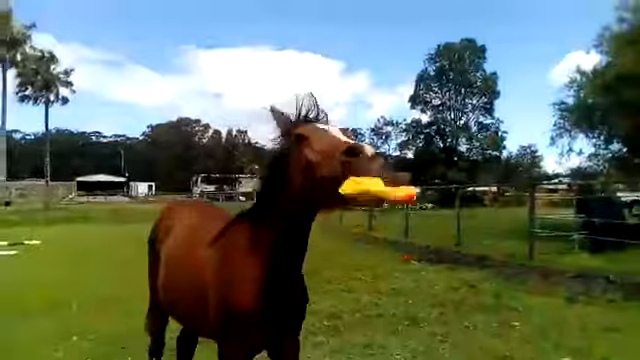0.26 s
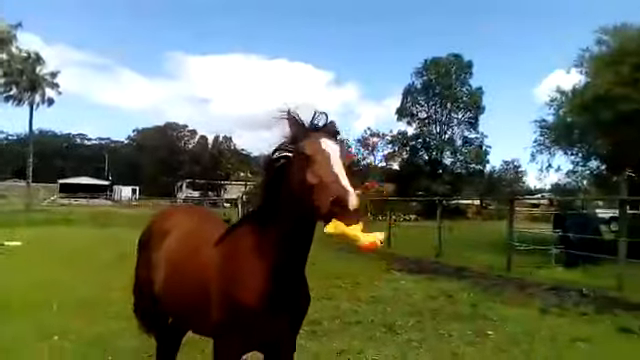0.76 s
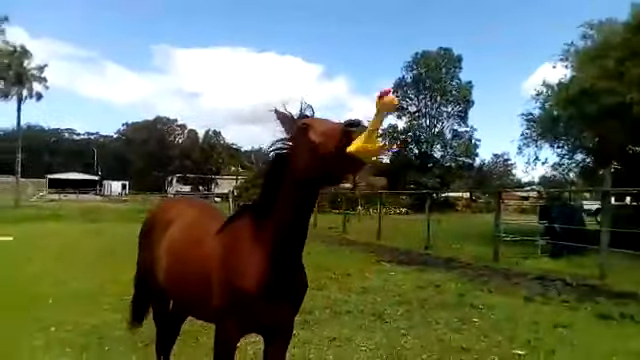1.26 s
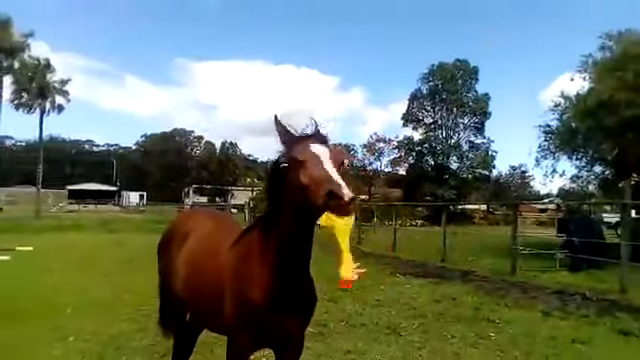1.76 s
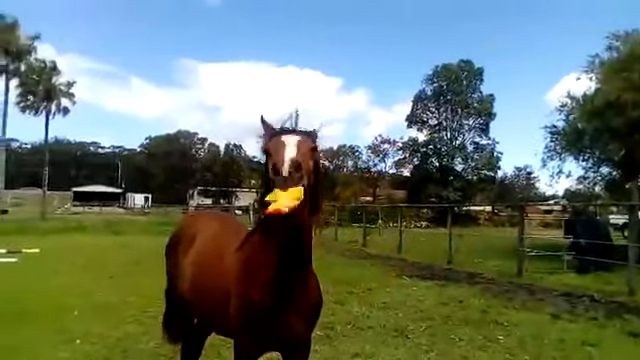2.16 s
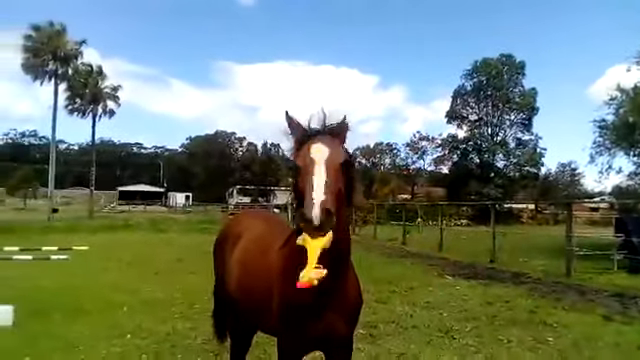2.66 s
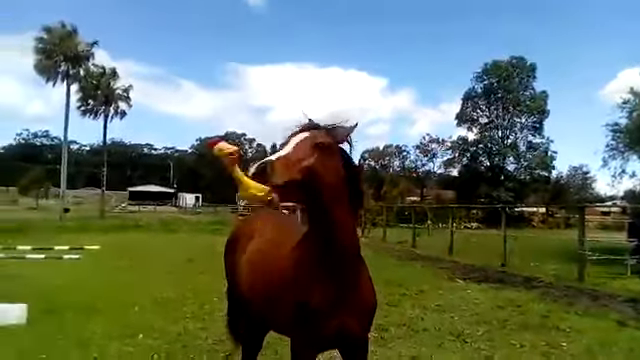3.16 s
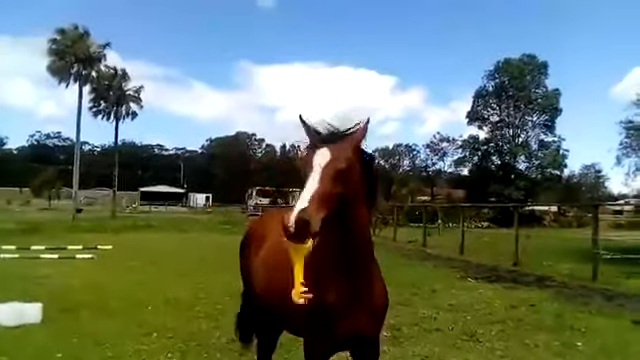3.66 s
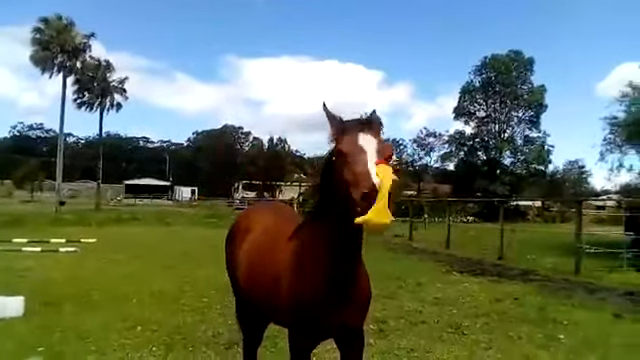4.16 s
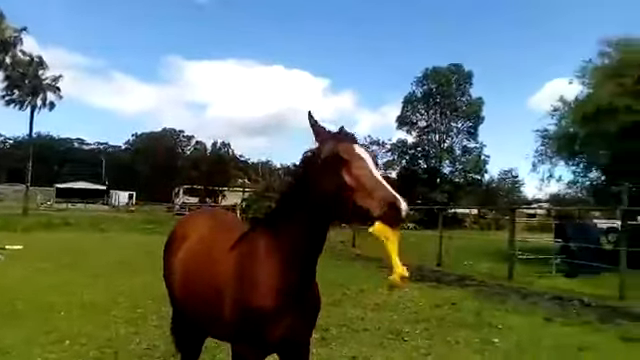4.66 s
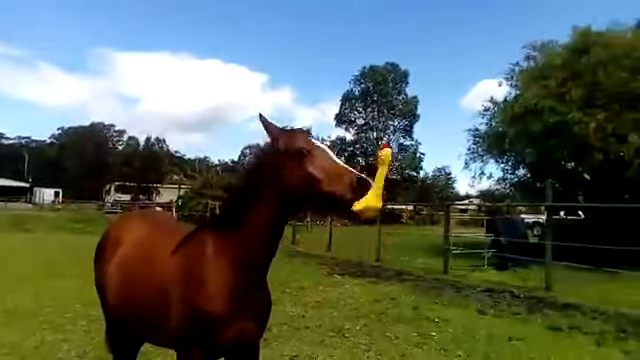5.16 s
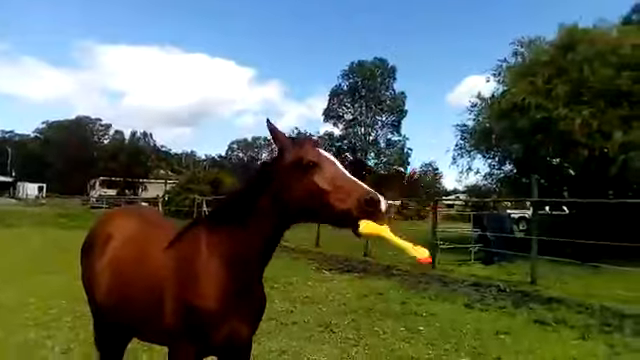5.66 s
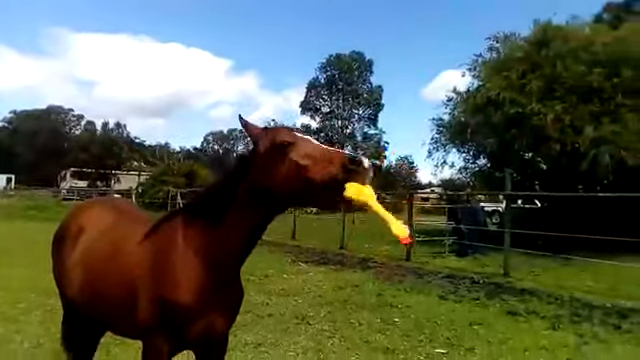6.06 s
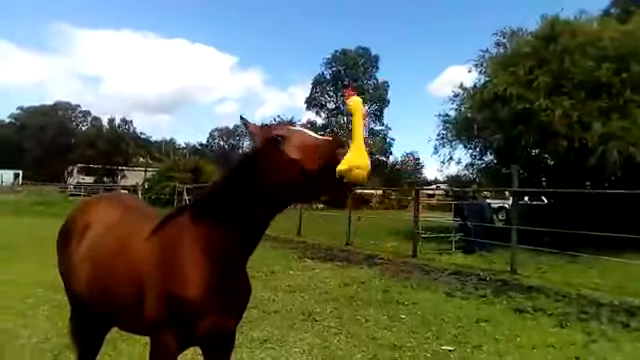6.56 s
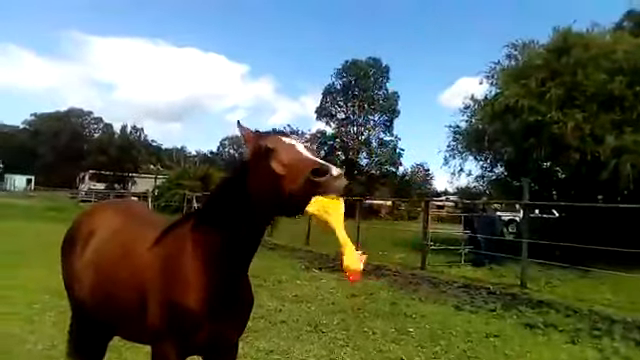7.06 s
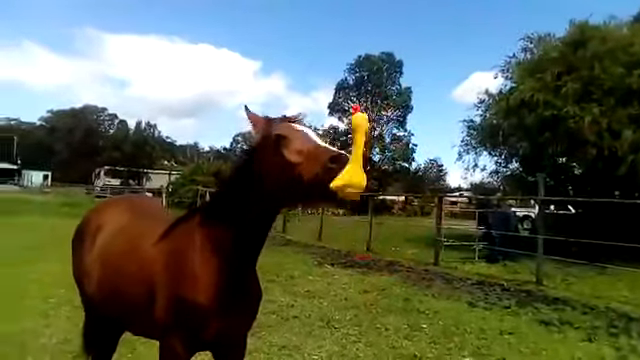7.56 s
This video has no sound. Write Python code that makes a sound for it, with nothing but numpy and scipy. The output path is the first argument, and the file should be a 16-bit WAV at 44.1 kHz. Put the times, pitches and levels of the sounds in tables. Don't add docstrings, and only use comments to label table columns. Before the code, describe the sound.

From 0 s a rubber chicken toy is already squawking, shaken by a horse in an open paddock. About three swings per second each yield four quick notes: a short honk, a springing gasp, a longer hard squawk and a duller refill wheeze. The tone is nasal, reedy, hoarse and breathy, bending up and down within each note. Wind gusts thump and pop on the microphone around 0.35-0.6 s. From 1.5 to 4.7 s the hard squeezes rise into strained, rough squeals. Around 5-6.3 s they weaken into lower croaks, then grow bold again until the cut at about 7.8 s. Dull rubber slaps come occasionally, mostly from 5.5 to 7.6 s. Faint hoarse bird calls come in pairs near 1.3, 3.3, 4.9 and 6.8 s, with one at 7.7 s. A low distant motor hum is strongest at 3.5-5.7 s beneath breeze and hiss; the sound is dry, with barely any echo.

```python
import sys
import numpy as np
from scipy import signal
from scipy.io import wavfile
from scipy.ndimage import uniform_filter1d

SR = 44100
rng = np.random.default_rng(int(sys.argv[2]) if len(sys.argv) > 2 else 0)


def materialize(psi):
    bounded = np.clip(np.atleast_2d(psi).T, -1, 1)
    quanta = np.round(bounded * 32767).astype(np.int16)
    wavfile.write(sys.argv[1], SR, quanta)


def linear_from_db(decibels):
    return 10 ** (np.asarray(decibels, float) / 20)


N = 345303


def evened(x):
    return x / np.sqrt(np.mean(x ** 2) + 1e-20)


def add(mix, s, sound):
    part = mix[max(round(s * SR), 0):][:len(sound)]
    part += sound[:len(part)]


def at(s, table):
    return np.interp(s, *np.transpose(table))


def colour(points, humps=(), size=2048):
    f, db = np.transpose(points)
    hz = abs(np.fft.fftfreq(size, 1 / SR)) + 1
    db = np.interp(np.log(hz), np.log(f), db) - 60 * np.maximum(np.log2(hz / f[-1]), 0)
    for centre_hz, width_hz, hump_db in humps:
        db += hump_db * np.exp(-.5 * ((hz - centre_hz) / width_hz) ** 2)
    spectrum = np.exp(np.conj(signal.hilbert(np.log(linear_from_db(db)))))
    return np.fft.ifft(spectrum).real[:size // 2]


def wander(count, hz):
    b, a = signal.butter(2, hz, fs=SR)
    return evened(signal.lfilter(b, a, rng.standard_normal(count + 800))[800:])


def band(x, lo_hz, hi_hz):
    return signal.sosfilt(signal.butter(2, [lo_hz, hi_hz], "band", fs=SR, output="sos"), x)


def tail(t60_s, delay_s):
    t = np.arange(0, .5, 1 / SR)
    taps = rng.standard_normal(len(t)) * linear_from_db(-60 * t / t60_s) * (t >= delay_s)
    return taps / np.linalg.norm(taps)


def reed_beat(hz, turns, wobble, sway, tilt, patchy_db):
    k = np.arange(1, 32)[:, None]
    start, sway_hz = rng.random((2, 31, 1))
    t = np.arange(0, len(hz), 16) / SR - .004
    depth_db = patchy_db * np.clip((k - 1) / 2.4, .1, 1)
    patches = linear_from_db(depth_db * np.sin(2 * np.pi * (sway + (4 + 16 * sway_hz) * t)))
    patches = np.repeat(patches, 16, axis=1)[:, :len(hz)]
    partials = np.cos(2 * np.pi * (k * turns + 0.48 * start)) * patches * k ** -tilt
    beat = (partials * (k * hz < 14500)).sum(0)
    split = .5 * np.clip((hz - 1400) / 200, 0, 1) * np.clip((2010 - hz) / 230, 0, 1) * linear_from_db(2.5 * wobble)
    return evened(beat * (1 + split * np.cos(np.pi * turns)))


def reed_leak(hz, turns, strain, slide, hiss):
    noise = rng.standard_normal(len(hz))
    thin = 0.45 * np.clip((hz - 1420) / 300, 0, 1)
    noise = (0.8 - thin) * noise + (0.62 + 1.3 * thin) * band(noise, 1520, 13000)
    onset = np.exp(-np.arange(len(hz)) / SR / 0.0052)
    level = hiss * (0.18 + 0.27 * strain + 0.4 * slide + 0.47 * onset)
    return level * (1 + .5 * np.cos(2 * np.pi * turns)) * noise


# (time [s], treble [dB])
BEAK_FACING = [(0, 1.5), (.9, .3), (2.1, .8), (2.4, 2.8), (3.3, 2.7), (4.2, 2), (4.5, -.8), (5.1, -2.5),
               (5.7, -.5), (6.5, -2.5), (6.9, 0), (7.5, -.2), (7.83, -3.5)]


def squeak(row, lag_s, share, rest_hz, pipe, flat, rise_s, fall_s, jitter, hiss, tilt, swell_db,
           flutter_db, patchy_db, drift):
    s, length_s, db, top_hz, half_width = row
    under_way = s <= .01
    crest = 0 if under_way else lag_s / length_s + share
    t = np.arange(-.004, length_s + .012, 1 / SR)
    age_s = t - t[0]
    push = np.clip(1 - abs((t / length_s - crest) / half_width) ** flat, 0, 1)
    wobble, flutter = wander(len(t), 258), wander(len(t), 103)

    hz = rest_hz + (top_hz - rest_hz) * push
    strain = np.clip((top_hz / rest_hz - 1.06) / 0.23, 0, 1)
    slide = np.clip(uniform_filter1d(abs(np.gradient(hz)) * SR / 45000, 200), 0, 1)
    unsteady = jitter * (0.1 + 0.19 * strain * (1 - 0.61 * push) + slide)
    hz = hz * (1 - 0.04 * np.exp(-age_s / 0.00928)) * (1 + unsteady * wobble)
    sag = .035 * np.exp((t - length_s) / .009)
    turns = np.cumsum(hz * (1 + drift * flutter - sag)) / SR

    sway = rng.random((31, 1))
    beat = reed_beat(hz, turns, wobble, sway, tilt, patchy_db)
    leak = reed_leak(hz, turns, strain, slide, hiss)
    opening = 1 if under_way else np.clip((age_s - .003) / rise_s, 0, 1)
    edge = opening * np.clip((t[-1] - t) / fall_s, 0, 1) ** 2.4
    drive = edge * linear_from_db(swell_db * uniform_filter1d(push, size=700)) * (beat + leak)

    body = signal.sosfilt(signal.butter(2, 1800, fs=SR, output="sos"), drive)
    drive += (linear_from_db(1.2 * flutter_db * flutter) - 1) * body
    facing_db = at(s, BEAK_FACING)
    dulling_db = -1.5 * np.clip(t / length_s, 0, 1.2) ** 3
    drive += (linear_from_db(facing_db + 0.8 + dulling_db) - 1) * band(drive, 2600, 16000)
    beam_db = 0.75 * facing_db + 3 * np.sin(2 * np.pi * (sway[0] + 9 * t))
    drive += (linear_from_db(beam_db) - 1) * band(drive, 6360, 10300)
    sound = signal.oaconvolve(drive, pipe)
    return s + t[0], linear_from_db(db) * evened(sound) * np.sqrt(length_s * SR / len(sound))


# (frequency [Hz], gain [dB])
PIPE_OUT = [(250, -40), (480, -9), (1000, -0.5), (1400, -4.5), (1650, -22.5), (2200, -24.5), (3100, -17),
            (5000, -9.5), (7300, -21), (8600, -33.5), (10200, -42), (13000, -67)]
PIPE_IN = [(250, -38), (560, -0.5), (900, 3), (1200, 1), (1520, -5), (1750, -23), (2300, -28), (4300, -19),
           (5900, -15), (7600, -24.5), (8600, -36.5), (10200, -44.5), (13000, -57)]
# (centre [Hz], width [Hz], gain [dB])
HOLLOWS = [(656, 44.3, 6.5), (1422, 36, 4), (2010, 273, -6), (2407, 63, 12), (2770, 28, -1), (3102, 111, 9),
           (3630, 188, -9), (3990, 160, 2.5), (5005, 50, 6), (5650, 560, -4.5), (6880, 177, 4.5),
           (10100, 330, 7), (12300, 500, 10)]
HOLLOWS_OUT = [(3560, 110, -3), (3130, 120, 1.5), (1850, 120, -4), (4160, 60, -6), (5880, 60, -5),
               (6450, 110, -4), (7500, 70, -4)]
HOLLOWS_IN = [(2620, 70, -5), (4480, 90, 4), (5420, 90, -8)]
# (time [s], length [s], level [dB], top pitch [Hz], push half width [0-1])
FLICKS = [(.038, .064, -15.5, 1052, .28), (.359, .059, -18, 1114, .35), (.679, .066, -21, 829, .24),
          (1.002, .056, -22, 812, .15), (1.324, .052, -22, 755, .33), (1.636, .063, -20.5, 1337, .34),
          (1.951, .059, -19, 1271, .37), (2.263, .052, -20.3, 790, .25), (2.596, .046, -23, 780, .26),
          (2.896, .054, -19.8, 839, .39), (3.223, .03, -23.5, 460, .1), (3.536, .059, -16.5, 1304, .42),
          (3.848, .058, -16.5, 1198, .35), (4.168, .065, -18, 1428, .35), (4.483, .06, -17, 1338, .39),
          (4.809, .057, -18.5, 1234, .37), (5.183, .039, -36.5, 436, .7), (5.508, .063, -22, 700, .2),
          (5.896, .048, -33, 432, .34), (6.229, .056, -26, 444, .6), (6.568, .059, -22.5, 556, .09),
          (6.891, .072, -19, 1688, .3), (7.23, .063, -20, 755, .22), (7.569, .063, -21, 830, .3)]
# (time [s], length [s], level [dB], top pitch [Hz], push half width [0-1])
WHIPS = [(.181, .079, -13.5, 1280, .35), (.515, .064, -15.5, 755, .38), (.823, .077, -14.5, 1219, .34),
         (1.141, .087, -16, 1350, .34), (1.468, .079, -16.5, 1620, .29), (1.778, .09, -18, 2000, .36),
         (2.085, .087, -17.2, 1760, .42), (2.408, .095, -15.5, 1351, .37), (2.717, .08, -17.5, 2027, .41),
         (3.028, .088, -15.5, 1500, .32), (3.354, .089, -14, 1385, .39), (3.681, .084, -16, 1990, .46),
         (4.001, .093, -16.5, 1928, .34), (4.319, .071, -18, 1930, .48), (4.636, .083, -17.5, 1778, .33),
         (4.983, .077, -16, 1066, .3), (5.340, .067, -20, 550, .25), (5.702, .074, -20.5, 469, .35),
         (6.07, .058, -22.9, 448, .55), (6.383, .091, -14.7, 1212, .34), (6.719, .094, -14.4, 1338, .39),
         (7.048, .1, -16, 1670, .33), (7.392, .094, -15, 1376, .33), (7.723, .096, -15.5, 1603, .32)]
# (time [s], length [s], level [dB], top pitch [Hz], pull half width [0-1])
GASPS = [(.108, .062, -15.5, 765, .22), (.427, .07, -17, 755, .19), (.749, .072, -19.5, 734, .17),
         (1.064, .076, -19, 763, .24), (1.384, .068, -20, 759, .23), (1.707, .051, -19, 720, .2),
         (2.016, .055, -18, 796, .35), (2.328, .07, -18, 735, .24), (2.659, .039, -18, 713, .16),
         (2.959, .06, -16, 874, .28), (3.281, .061, -16.5, 754, .34), (3.61, .063, -19, 852, .23),
         (3.917, .076, -18, 920, .2), (4.237, .071, -18, 910, .2), (4.549, .081, -19, 1060, .2),
         (4.872, .096, -19.5, 1060, .19), (5.222, .1, -21.5, 774, .3), (5.572, .11, -20.5, 755, .32),
         (5.956, .094, -21.5, 627, .1), (6.302, .063, -21, 589, .26), (6.631, .071, -17, 620, .34),
         (6.963, .069, -17, 753, .28), (7.3, .086, -18.5, 757, .27), (7.634, .078, -17, 822, .33)]
# (time [s], length [s], level [dB], top pitch [Hz])
SIGHS = [(0.0, .031, -13.3, 615), (.263, .09, -17.5, 584), (.581, .092, -18.5, 582), (.895, .088, -17, 614),
         (1.228, .084, -21, 594), (1.555, .071, -21, 579), (1.889, .051, -19.5, 582),
         (2.191, .052, -18, 581), (2.511, .065, -19, 597), (2.826, .046, -18, 585), (3.13, .062, -17, 594),
         (3.455, .068, -17, 593), (3.787, .058, -18, 591), (4.105, .066, -19.5, 577),
         (4.42, .063, -19, 598), (4.738, .07, -20.5, 598), (5.065, .096, -21.4, 604),
         (5.41, .086, -21.5, 582), (5.779, .087, -23.5, 570), (6.139, .068, -24.1, 576),
         (6.478, .073, -22.5, 566), (6.818, .067, -22.2, 567), (7.154, .071, -22.7, 555),
         (7.499, .069, -21, 574)]
# (time [s], roundness [-], widening [-], crest lag [s])
REBOUND = [(0, 2.2, 1.1, .017), (.75, 1.7, 1.25, .015), (1.4, 1.6, 1.3, .019), (2.0, 2.2, 1.1, .021),
           (3.0, 1.7, 1.2, .019), (3.3, 2.4, 1.05, .019), (3.6, 1.2, 1.05, .017), (4.25, 1.0, 1.25, .021),
           (4.55, .7, 1.6, .026), (4.9, .7, 1.6, .023), (5.2, 2.6, 1.05, .017), (7.83, 2.5, 1.05, .018)]
# (time [s], share [0-1])
SHAKING = [
    (0, .85),
    (1.5, 1),
    (4.9, 1),
    (5.4, .65),
    (6.4, .65),
    (6.9, .9),
    (7.83, .9),
]


def toy():
    out = np.zeros(N)
    out_rest_hz, in_rest_hz = 440, 560
    pipe_out = colour(PIPE_OUT, HOLLOWS + HOLLOWS_OUT)
    pipe_in = colour(PIPE_IN, HOLLOWS + HOLLOWS_IN)
    pipe_sigh = colour(PIPE_IN, HOLLOWS + HOLLOWS_IN + [(4900, 1100, -2.5)])
    for flick, whip in zip(FLICKS, WHIPS):
        for row, lag_s, share in (flick, -.008, .6), (whip, .004, .46):
            add(out, *squeak(row, lag_s, share, out_rest_hz, pipe_out, flat=2.1, rise_s=0.009,
                             fall_s=.031, jitter=0.062, hiss=.6, tilt=0.33, swell_db=6.5,
                             flutter_db=2.32, patchy_db=6, drift=.009))
    times, *rebound = np.transpose(REBOUND)
    for sigh, gasp in zip(SIGHS, GASPS):
        flat, widening, lag_s = (np.interp(gasp[0], times, column) for column in rebound)
        row = (*gasp[:-1], gasp[-1] * widening)
        add(out, *squeak(row, lag_s, .22, in_rest_hz, pipe_in, flat=flat, rise_s=0.0075,
                         fall_s=0.023, jitter=.058, hiss=0.64, tilt=0.21, swell_db=3.0,
                         flutter_db=2.1, patchy_db=9.5, drift=.009))
        shake = at(sigh[0], SHAKING)
        sigh_rest_hz = in_rest_hz + .4 * (sigh[-1] - in_rest_hz)
        add(out, *squeak((*sigh, .46), .004, .5, sigh_rest_hz, pipe_sigh, flat=1.9, rise_s=0.0052,
                         fall_s=0.022, jitter=.036 * shake, hiss=.56 * shake, tilt=0.2, swell_db=1.5,
                         flutter_db=1.1, patchy_db=8.5, drift=.007 * shake))
    return out


# (time [s], peak [dB], pitch [Hz])
SLAPS = [(0.674, -29, 233), (2.88, -37, 201), (2.999, -31, 185), (4.619, -44, 207), (5.494, -32, 256),
         (5.877, -25.5, 228), (6.226, -27.5, 216), (6.555, -28, 203), (6.879, -27, 215),
         (7.221, -31.5, 197), (7.558, -47, 220)]


def slaps():
    out, t = np.zeros(N), np.arange(0, .08, 1 / SR)
    for s, db, hz in SLAPS:
        knock = np.sin(2 * np.pi * hz * t) * np.exp(-t / 0.0044) * (1 - np.exp(-t / 0.0018))
        tick = .12 * band(rng.standard_normal(len(t)), 1500, 4500) * np.exp(-t / .004)
        add(out, s, linear_from_db(db + 10.5) * (knock + tick))
    return out


# (time [s], level [dB])
BIRD_CALLS = [
    (1.28, -47),
    (1.58, -45),
    (3.25, -44),
    (3.57, -43.5),
    (4.85, -46.5),
    (5.18, -47),
    (6.79, -47.5),
    (7.11, -47),
    (7.74, -47),
]


def bird():
    out, t = np.zeros(N), np.arange(0, .1, 1 / SR)
    for s, db in BIRD_CALLS:
        hz = (1900 + 550 * (t / t[-1]) ** .6) * (1 + 0.06 * wander(len(t), 390))
        turns = np.cumsum(hz) / SR
        call = np.sin(2 * np.pi * turns) + 0.65 * np.sin(4 * np.pi * turns)
        add(out, s, linear_from_db(db) * call * np.hanning(len(t)) ** 0.22)
    return signal.oaconvolve(out, 4.0 * tail(0.29, 0))[:N]


# (time [s], peak [dB], pitch [Hz])
POPS = [
    (0.355, -9, 169),
    (.384, -10, 191),
    (0.405, -10, 131),
    (.474, -13, 170),
    (0.501, -18, 131),
    (.564, -12.5, 95),
    (7.025, -22, 86),
]


def pops():
    out = np.zeros(N)
    for s, db, hz in POPS:
        turns = np.arange(0, 1.22 / hz, 1 / SR) * hz
        add(out, s, linear_from_db(db) * np.sin(2 * np.pi * turns) * np.hanning(len(turns)) ** 0.47)
    return out


# (time [s], peak [dB], 20 dB fall time [s], brightness [dB])
GUSTS = [(0.0, -35, .05, 8), (.37, -24, .06, 14), (.44, -19, .11, -7), (.52, -33, .05, 11),
         (.57, -14, .035, -8), (.79, -28, .09, -6), (.89, -37, .07, -8), (1.24, -41, .15, -8),
         (1.5, -44, .15, -8), (1.77, -31, .06, -22), (5.58, -40, .08, -4), (5.66, -37, .08, -18),
         (6.02, -35, .08, -9), (6.3, -24, .1, -19), (6.65, -41, .15, -3), (6.79, -33, .07, -23),
         (6.89, -32, .1, -2), (7.025, -22, .06, -13), (7.13, -39, .08, -11), (7.38, -43, .12, -8),
         (7.57, -31.5, .08, -8), (7.7, -36.5, .2, -7)]


def wind():
    t, t_gain = np.arange(N) / SR, np.arange(0, N + 64, 64) / SR
    s, db, fall_s, bright_db = np.transpose(GUSTS)[:, :, None]
    gusts = linear_from_db(db - 20 * abs(t_gain - s) / fall_s)
    lumps_db = 1.8 * wander(N + 64, 6.5)[::64][:len(t_gain)]
    low_gain = linear_from_db(-52 + lumps_db) + gusts.sum(0)
    high_gain = linear_from_db(-45.5 + lumps_db) + (gusts * linear_from_db(bright_db)).sum(0)
    low = evened(band(rng.standard_normal(N), 56, 114)) * linear_from_db(1.4 * wander(N, 42))
    high = evened(band(band(rng.standard_normal(N), 75, 217), 60, 347)) * linear_from_db(2.45 * wander(N, 23))
    return np.interp(t, t_gain, low_gain) * low + np.interp(t, t_gain, high_gain) * high


# (time [s], pitch [Hz], level [dB])
HUM = [
    (0, 101, -42),
    (1, 100, -38),
    (1.6, 100, -41),
    (2.5, 100, -42),
    (3.5, 101, -37),
    (4.6, 101, -36.5),
    (5.7, 100.5, -37),
    (6.2, 99, -43),
    (7, 100, -47),
    (7.83, 101, -47),
]


def hum():
    s, hz, db = np.transpose(HUM)
    t = np.arange(N) / SR
    turns = np.cumsum(np.interp(t, s, hz) + 1.3 * wander(N, 6)) / SR
    level_db = np.interp(t, s, db) + 1.3 * wander(N, 8)
    return np.sqrt(2) * linear_from_db(level_db) * np.sin(2 * np.pi * turns)


# (frequency [Hz], density [dB per Hz])
AIR = [(71, -15), (120, -33.5), (349, -21), (434, -11.5), (866, -23.5), (1120, -8), (1290, -27.5),
       (1570, -25), (7030, -28), (13500, -59)]


def air():
    hiss = signal.oaconvolve(rng.standard_normal(N), colour(AIR))[:N]
    return evened(hiss) * linear_from_db(-42 + 1.8 * wander(N, 9))


def scene():
    near = toy() + slaps()
    bounce = np.r_[np.zeros(240), near[:-240]]
    echoes = signal.oaconvolve(near, tail(0.1, 0.036))[:N]
    paddock = bird() + wind() + pops() + hum() + air()
    return (near + linear_from_db(-30) * bounce + linear_from_db(-25) * echoes + paddock)[None]


# (centre [Hz], width [Hz], gain [dB])
HOUSING = [(3720, 48, -12), (8900, 197, -11), (8960, 40, -8), (11300, 120, -15), (11700, 150, -4),
           (14100, 500, -57)]


def housing(x):
    return signal.oaconvolve(x, colour([(100, 0.0093), (15000, 0.0077)], HOUSING))[None, :N]


def top_cut(x):
    return signal.sosfilt(signal.butter(12, 13750, fs=SR, output="sos"), x)


def record(dry):
    rounded = .95 * np.tanh(dry[0] / .95)
    return top_cut(housing(rounded))


dry = scene()
out = record(dry)
materialize(out)
```